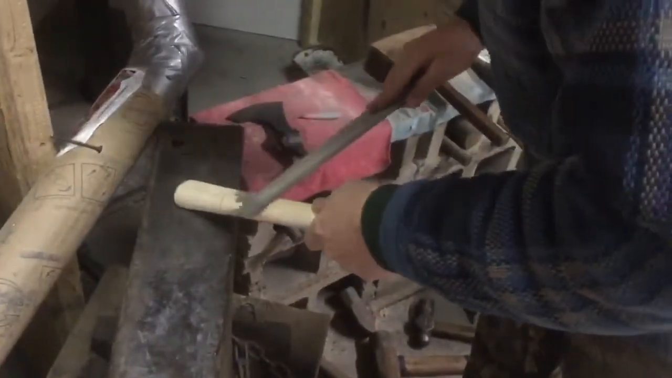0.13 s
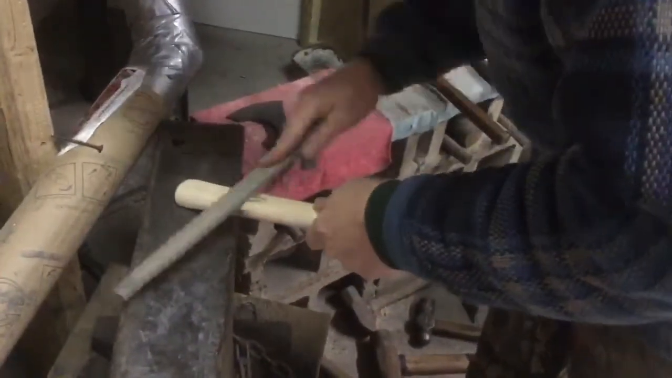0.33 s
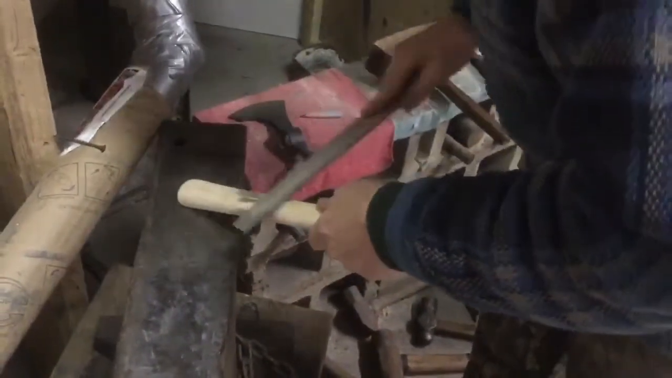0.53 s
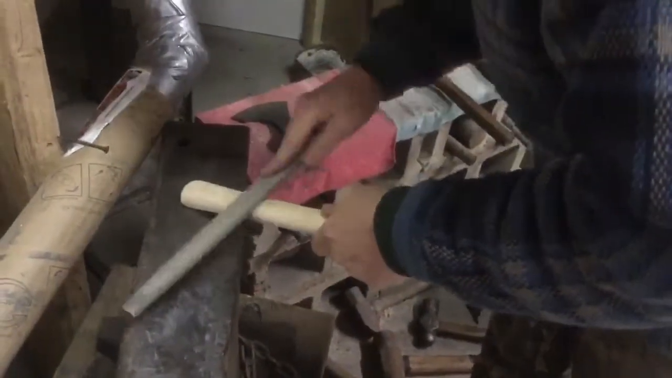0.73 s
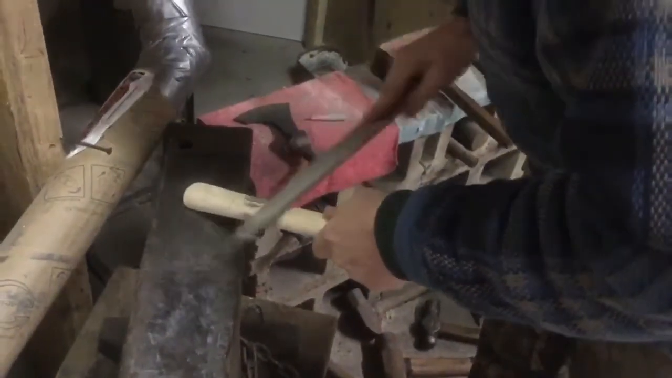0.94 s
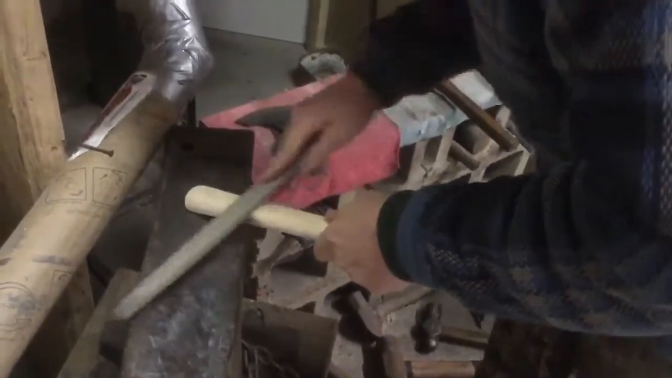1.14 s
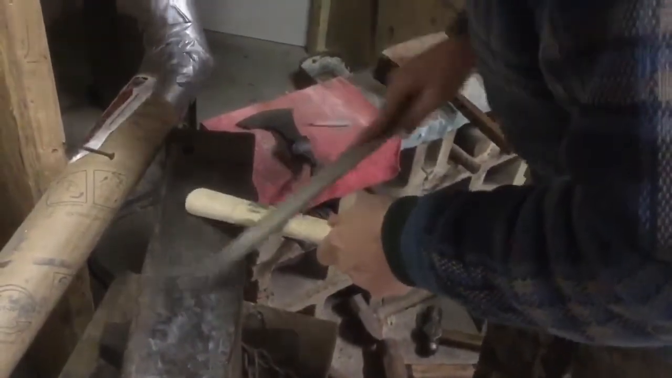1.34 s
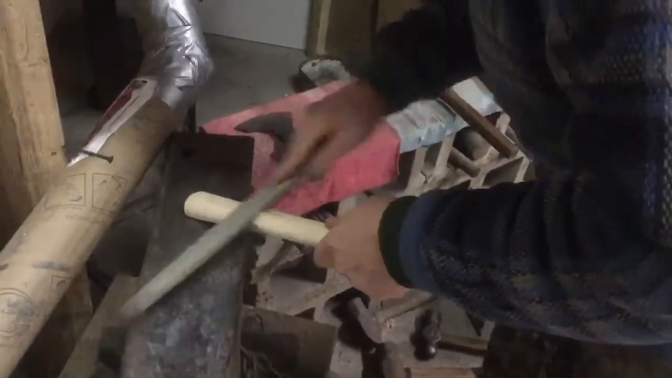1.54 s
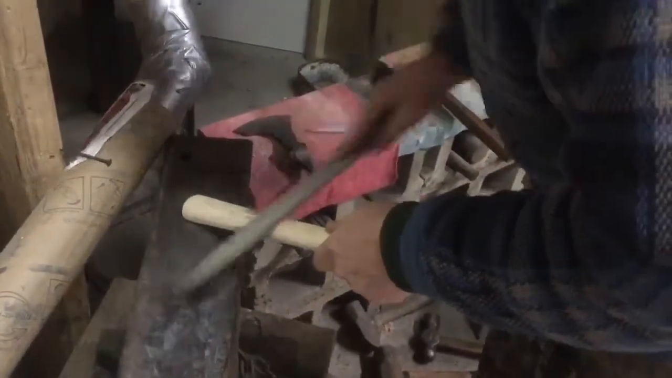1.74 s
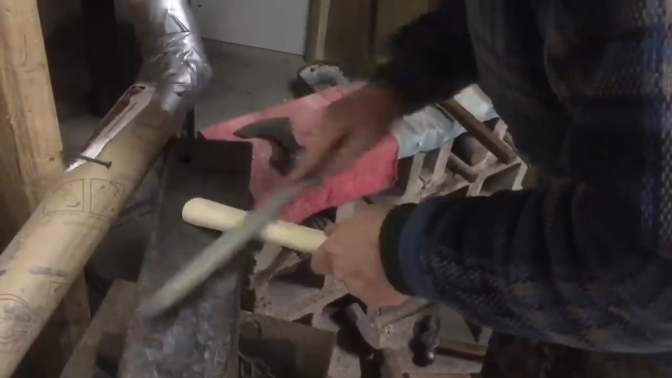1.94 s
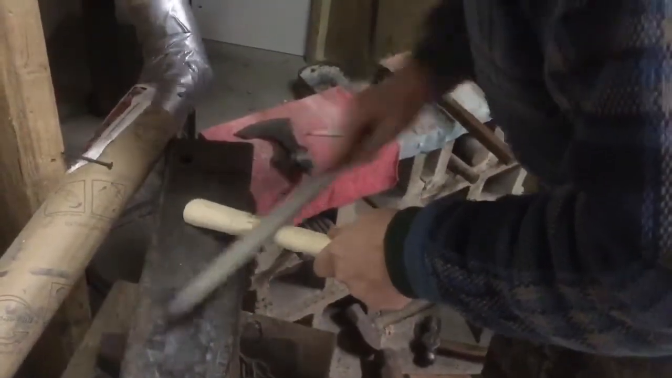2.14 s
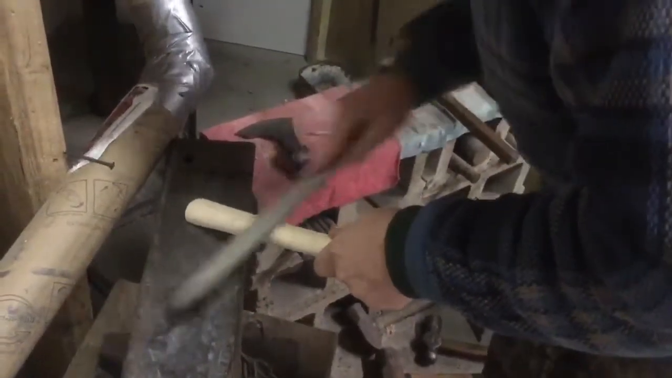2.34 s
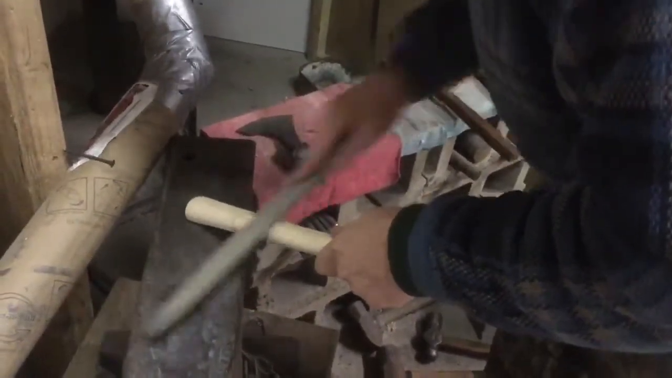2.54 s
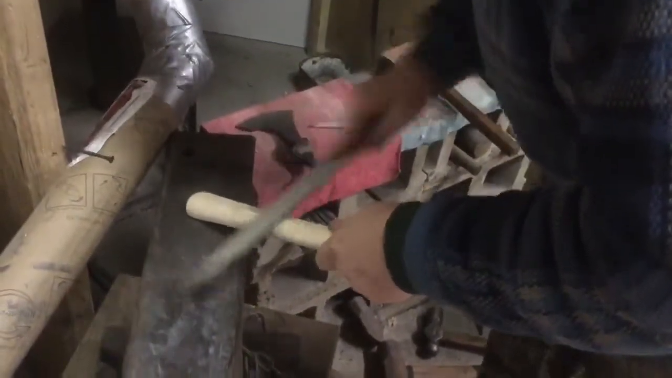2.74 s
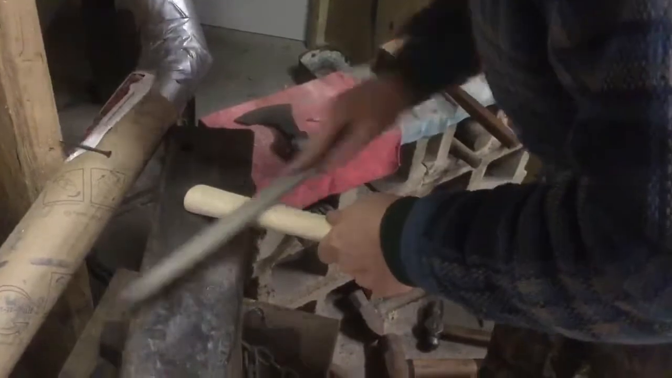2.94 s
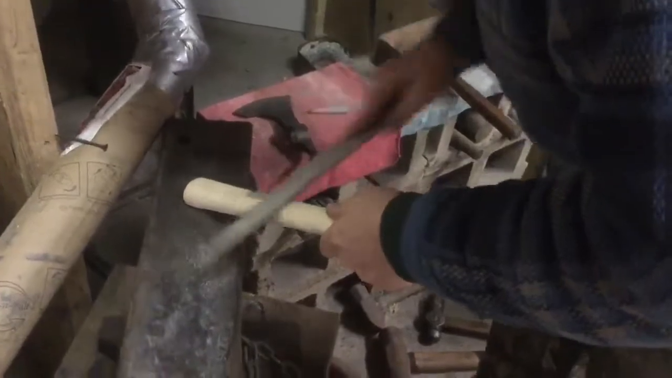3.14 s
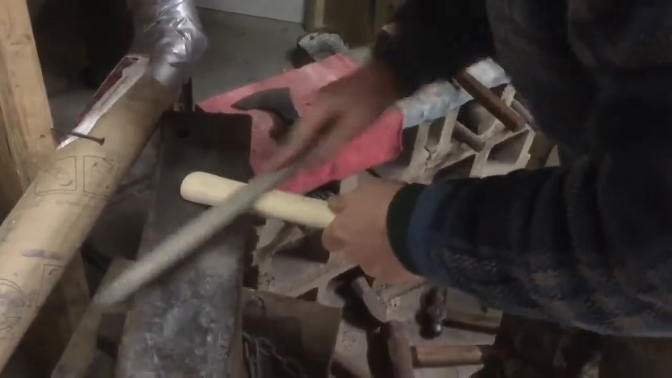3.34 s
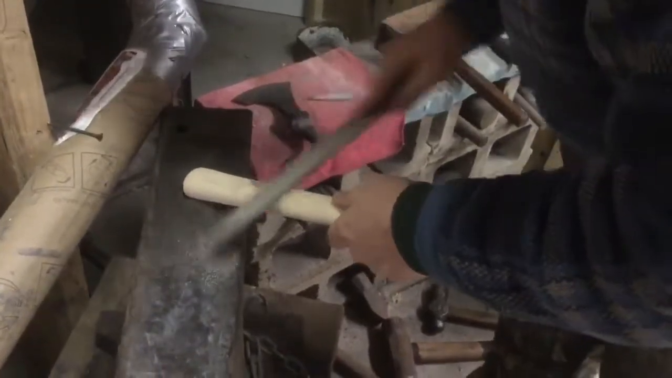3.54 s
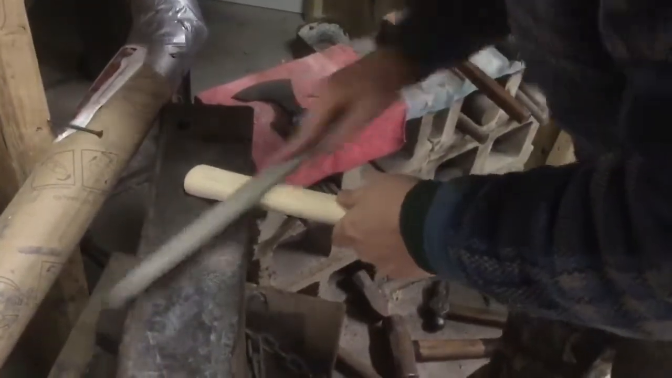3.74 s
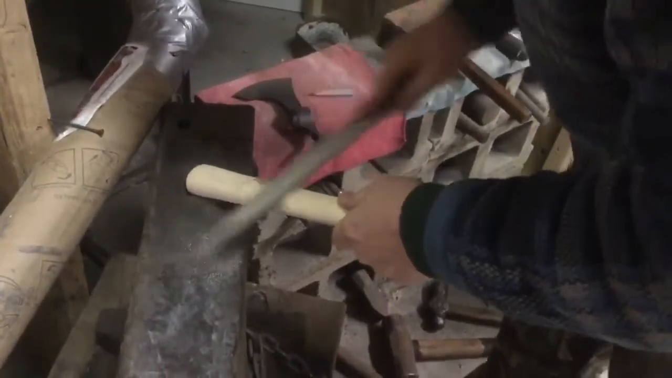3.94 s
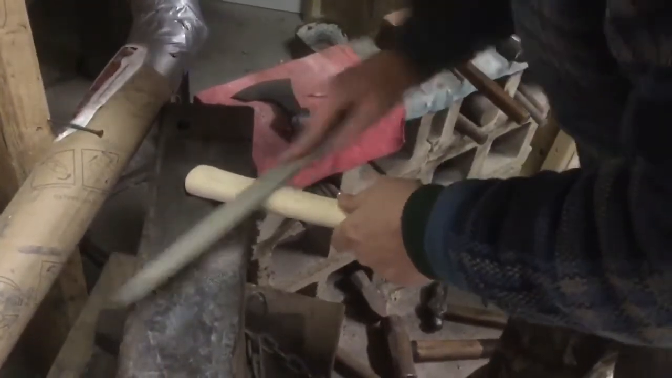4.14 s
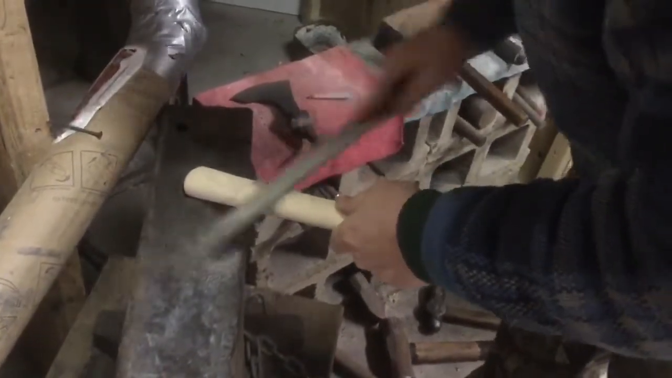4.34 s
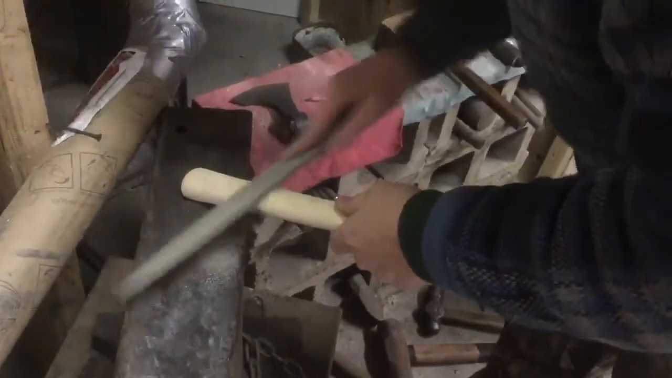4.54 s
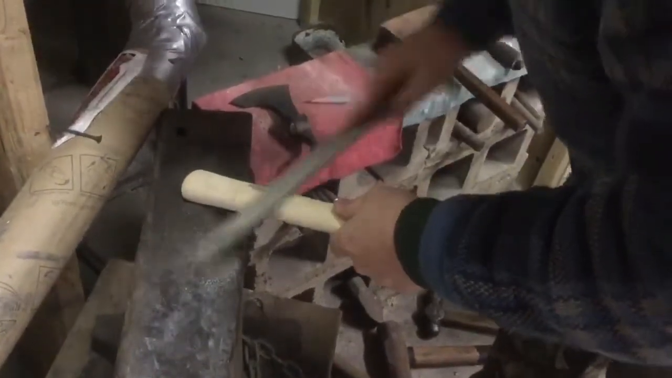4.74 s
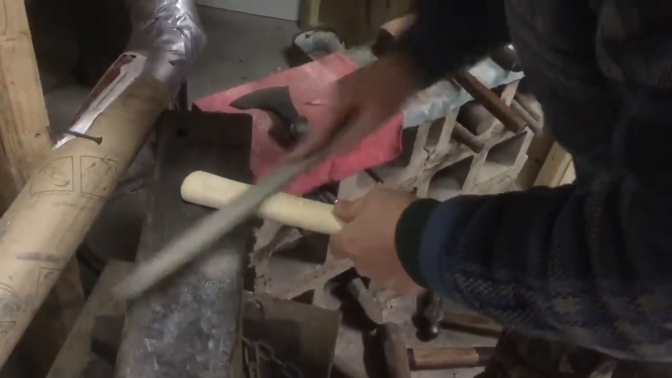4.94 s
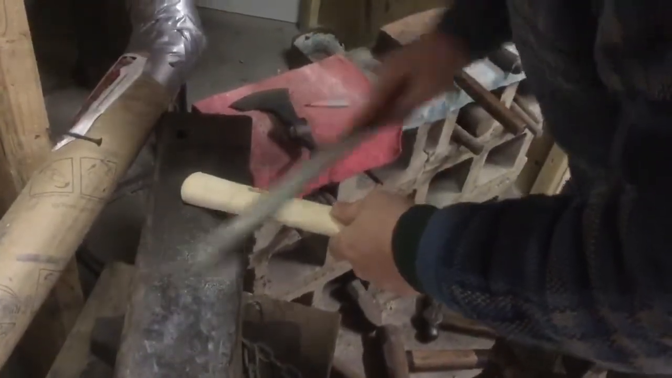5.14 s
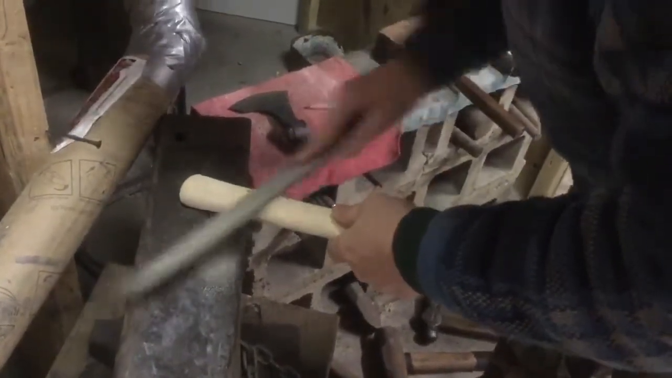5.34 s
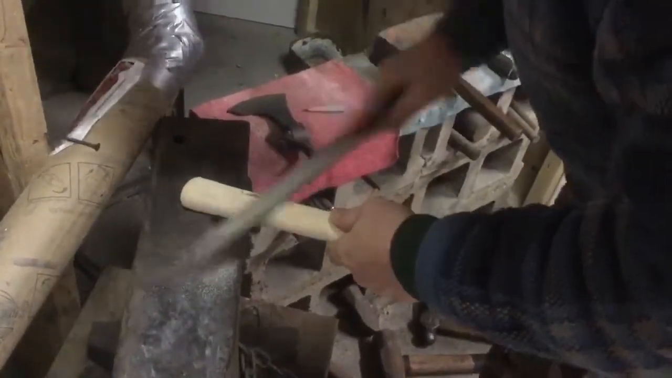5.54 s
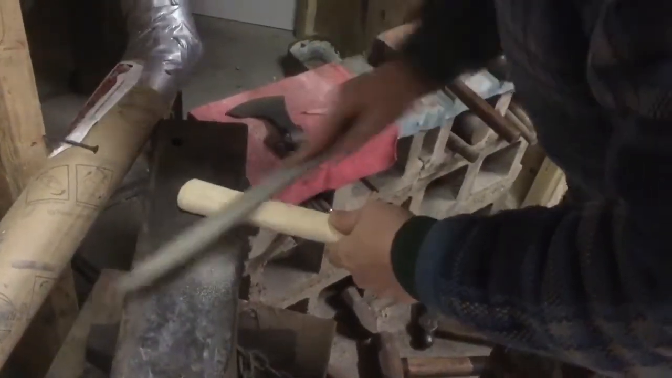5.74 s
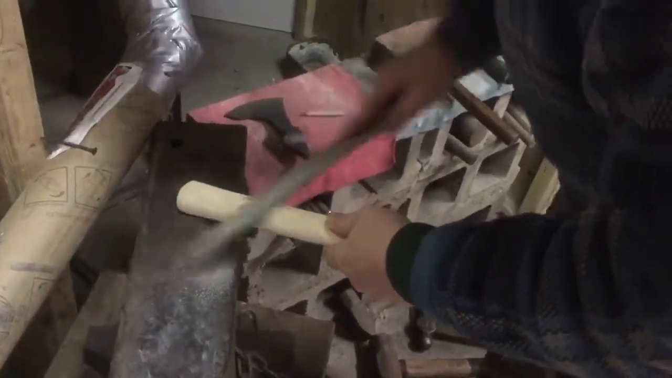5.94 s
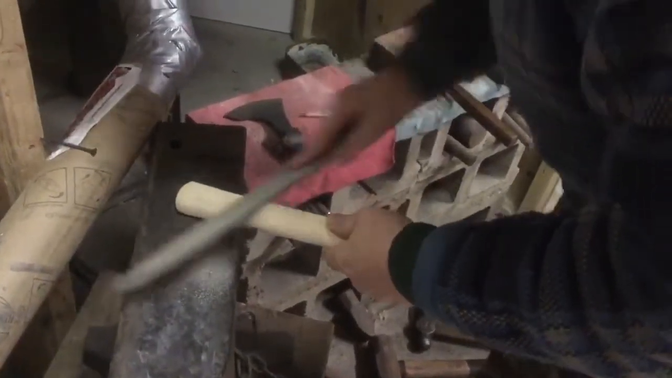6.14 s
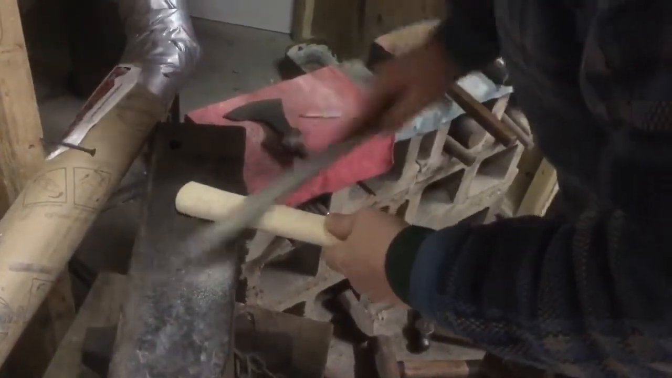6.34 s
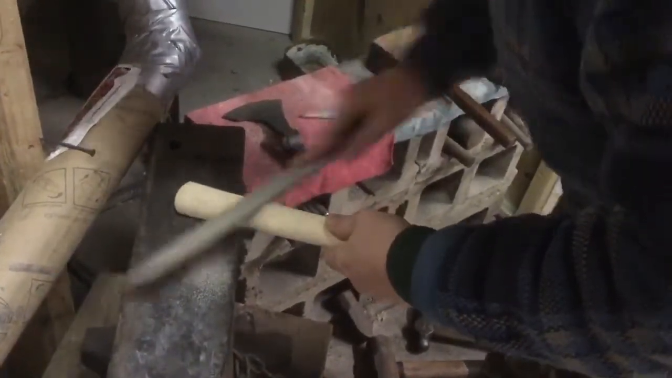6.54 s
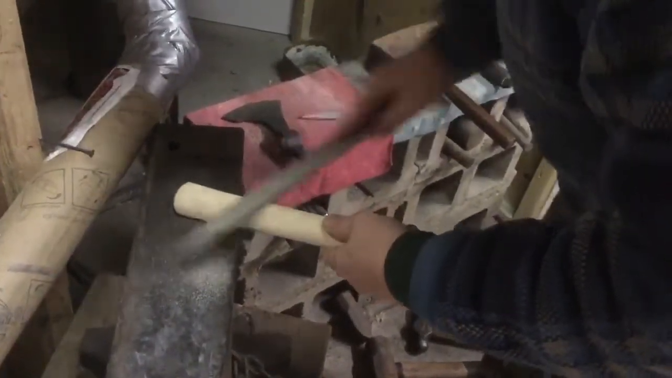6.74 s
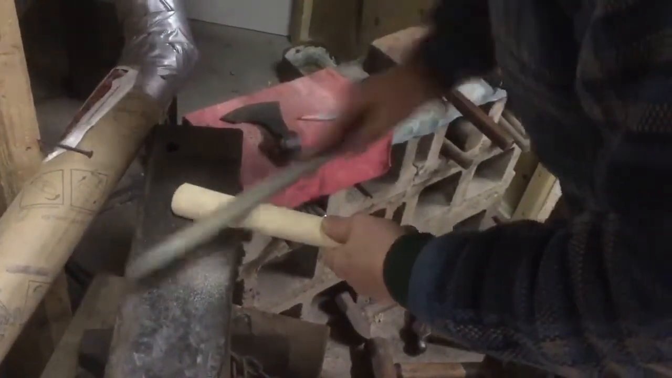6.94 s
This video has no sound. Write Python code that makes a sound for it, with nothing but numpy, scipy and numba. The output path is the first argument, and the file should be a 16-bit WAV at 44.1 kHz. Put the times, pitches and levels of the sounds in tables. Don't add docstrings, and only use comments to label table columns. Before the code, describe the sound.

After a small tap, coarse file strokes scrape wood in a steady fast to-and-fro rhythm, close up in a small workshop.

```python
import sys
import numpy as np
from scipy import signal
from scipy.fft import rfft, irfft
from scipy.io import wavfile
from scipy.ndimage import uniform_filter1d
from numba import njit

SR = 44100
rng = np.random.default_rng(int(sys.argv[2]) if len(sys.argv) > 2 else 0)


def digitize_waveform(pressure):
    field = np.atleast_2d(pressure).T
    bounded = np.clip(field, -1, 1)
    quanta = np.round(bounded * 32767).astype(np.int16)
    wavfile.write(sys.argv[1], SR, quanta)


def volts_from_db(level):
    exponent = np.asarray(level, float) / 20
    return 10 ** exponent


N = 313110

# turn in seconds, top in dB, lean (late minus early) in dB, handle share in dB,
# wood face share in dB.
PUSHES = [(.117, -29, 13.5, -14, -3), (.576, -26.5, 2, -20, -2.1), (.948, -25.5, 2, -19, -0.5),
          (1.317, -26.5, 0, -22.5, -0.5), (1.698, -25.5, -2.5, -19.5, -1), (2.079, -26.5, 1.5, -19.5, -0.6),
          (2.459, -29.5, -1.5, -16, 2.5), (2.851, -27.5, 0, -18, 1.5), (3.229, -29, 1.5, -20.5, -0.7),
          (3.628, -27, 2, -21.5, -1.5), (4.031, -26.5, 3.5, -20, -1.3), (4.439, -27, 2, -18.5, -2.5),
          (4.839, -28, 4.5, -20, 0), (5.237, -27.5, -3, -18, -1.6), (5.644, -28, 4, -17.5, -1.5),
          (6.041, -27.5, -0.5, -19, -0.8), (6.443, -27.5, -3, -20.5, -1.5), (6.853, -26.5, 6, -20.5, -2.5)]
# turn in seconds, top in dB, lean (late minus early) in dB, handle share in dB,
# wood face share in dB.
PULLS = [(0.39, -35, -1, -8.5, 3), (.777, -35, 4, -10, 0.3), (1.143, -33.5, -6, -8, 3),
         (1.517, -34.5, 0, -11, 1.2), (1.9, -34.5, 4, -5, 1), (2.279, -34, 2.5, -8.5, 0),
         (2.657, -34.5, -2, -14.5, 1.1), (3.046, -32.5, 5, -14.5, 0.3), (3.436, -33.5, -3.5, -19.5, -0.5),
         (3.838, -34, -5.5, -9, 0.4), (4.237, -33.5, -5, -19, 1), (4.645, -32.5, 6.5, -18.5, 0.5),
         (5.041, -30.5, 0, -17.5, -1.5), (5.447, -31.5, 1, -15, -4), (5.847, -31.5, 7, -17, -3.5),
         (6.248, -31, 3, -19, -4.5), (6.656, -29.5, 0.5, -17.5, -6), (7.058, -30, -6, -18, -4)]
# share of the stroke, push in dB under the top, pull in dB under the top.
STROKE_COURSE = [
    (.09, -13, -9),
    (.22, -5, -4.5),
    (.45, -1.5, -0.26),
    (.7, -0.53, -1.1),
    (.84, -6.5, -2.5),
    (.93, -14, -6),
]
TURN_DB, FIRST_TURN_DB, LAST_PULL_S = (-50, -45.5), -61.5, 0.17
# low edge in Hz, high edge in Hz, trim in dB, dulling in dB per dB of slack,
# pitch bend as a share.
PARTS = [
    (467, 877, 0, -0.57, 0.099),
    (870, 1273, 1.5, -0.25, 0.035),
    (1331, 2845, -1.5, -0.01, 0.034),
    (2691, 4910, 0, 0, .012),
    (4900, 8160, -12.5, 0.32, 0.0018),
    (8750, 19000, 1.5, 1.15, .002),
]
# pitch in Hz, width in Hz, push level in dB, pull level in dB.
RUBBED_MODES = [(584, 72, -4.5, -15.5), (740, 130, -14, -25.5), (1006, 53, -12, 9), (1195, 104, -6.5, -11),
                (1408, 31, -7.5, -29), (1488, 39.5, -2.5, -8.5), (1759, 95, -1.5, -9.5),
                (2029, 98, -7.5, -0.5), (2320, 246, -1.5, -14.5), (2687.5, 295, -5.5, -9),
                (3110, 127, -5.5, -3.5), (3388, 77, -3, -7.5), (3643, 163, 0, -6.5), (3975, 140, -2, -3),
                (4274, 74, -2, -3.5), (4492, 45, -1, -7), (4817, 210, -9, -12.5), (5306, 255, -18, -22.5),
                (6004, 227, -14, -19), (6680, 820, -25, -32), (7094, 125, -20.5, -22),
                (7440, 180, -24.5, -34.5), (8147, 87, -19, -25.5), (8768, 105, -23.5, -24),
                (9200, 450, -33.5, -49), (10180, 120, -28, -31), (11130, 910, -41, -62),
                (12430, 190, -31, -32.5), (13200, 1100, -46, -62), (14520, 260, -40.5, -42)]
# push first, middle, last in dB, then pull first, middle, last in dB.
BENCH_SHARE = (-33, -27, -19, -27, -25, -24.5)
# push first, middle, last in dB, then pull first, middle, last in dB.
EDGE_SHARE = (-30, -28, -26, -24, -28, -35)
HANDLE_SLIDE_DB, FACE_SLIDE_DB, EDGE_SLIDE_DB, BENCH_SLIDE_DB = (-6, 1.5), (-7, 2), (0, -3), (2, 2)
EDGE_FOLLOWS = 0.35
# middle in seconds, length in seconds, first tooth rate in Hz,
# last tooth rate in Hz, top in dB.
SQUEAKS = [(.275, .036, 1490, 1385, -26), (0.316, .04, 1290, 1120, -27.5), (1.405, .04, 2840, 2760, -36),
           (1.445, .036, 2750, 2120, -18.5), (1.467, .022, 1950, 1680, -24), (1.36, .05, 2300, 2450, -28),
           (1.814, .09, 2560, 2050, -32), (2.35, .035, 2380, 2680, -33), (2.378, .03, 2680, 2680, -28),
           (2.413, .025, 2300, 1950, -29), (2.525, .03, 2150, 2520, -20.5), (2.582, .035, 2480, 2050, -25),
           (2.802, .028, 2350, 1750, -24), (3.305, 0.042, 1502, 1440, -37.5), (3.367, .05, 1796, 1870, -30),
           (1.076, 0.062, 2497, 1955, -30), (1.351, .04, 1053, 1190, -37), (2.191, .1, 779, 740, -51),
           (2.56, 0.085, 776, 755, -51), (4.0, .09, 1028, 1143, -50), (1.069, .08, 1744, 1790, -33),
           (.675, .06, 1495, 1454, -37), (3.69, .05, 1517, 1530, -33.5), (1.229, .05, 990, 1034, -28.5)]
SQUEAK_FALL_DB = 15.5
# start in seconds, peak in dB.
TAPS = [
    (0.0316, -21.5),
    (0.0676, -37),
]
# pitch in Hz, level in dB, time to fall 60 dB in seconds.
TAP_MODES = [(313, -29, 0.07), (646, -13, 0.018), (1200, -28, 0.046), (1520, -16, 0.041),
             (2100, -9.5, 0.014), (2200, 2.5, 0.016), (3030, -5, 0.016), (3480, -2.5, 0.013),
             (3900, -8, .012), (4420, -17, 0.011), (5852, -21, .04), (7100, -26, .05)]
TAP_THIN_HZ, TAP_SOFT_HZ, TAP_TAIL_DB, TAP_TAIL_T60_S = 710, 3880, -8, 0.079
# frequency in Hz, level in dB per Hz.
TAP_TAIL = [(200, -47), (500, -15.5), (1100, -8), (2100, 0), (2600, -12), (3500, -8), (4300, -14),
            (5300, -39), (7500, -37), (9000, -79)]
# start in seconds, peak in dB, pitch in Hz.
THUDS = [(0.999, -39.5, 168), (1.524, -42, 320), (1.621, -57, 280), (2.978, -45, 162), (3.472, -33, 196),
         (4.907, -55, 299), (5.676, -47, 324), (6.472, -43, 286), (6.932, -54, 272)]
ROOM_T60_S, ROOM_DB, WALL_CUT_HZ = 0.23, -20.5, 4400
# time in seconds, level in dB.
WEIGHT = [(0.0, -76), (0.04, -45), (0.12, -66), (0.75, -62), (2.43, -66.5), (4.23, -60), (4.43, -73.5),
          (4.65, -52.5), (4.88, -78), (4.9, -63), (5.5, -57), (5.56, -68.5), (6.17, -56), (6.39, -68),
          (6.6, -51), (6.7, -72), (7.06, -56), (7.1, -64)]
# pitch in Hz, width in Hz, level in dB.
PANEL = [(240, 33, -4), (290.7, 27.5, 0.5), (321, 48, -10.5)]
# time in seconds, level in dB.
SWAY = [(0.0, -70.5), (0.97, -67.5), (2.75, -73.5), (2.79, -64.5), (5.02, -71), (5.26, -82), (5.4, -59),
        (5.61, -76), (5.83, -58), (5.89, -78), (6.21, -60.5), (6.47, -84), (6.53, -67), (7.1, -71)]
# frequency in Hz, level in dB per Hz.
RUMBLE = [(30, -45), (60, -10), (100, -8.5), (154, 4.5), (190, -2), (230, -36), (330, -39)]
SHAKE_FOLLOWS = 0.21
# frequency in Hz, level in dB per Hz.
HUSH = [(40, -40), (230, -5.5), (300, -7.5), (550, -13), (1650, -22.5), (2250, -25), (2630, -33),
        (3500, -26), (5300, -55), (8000, -84)]
HUSH_DB = -69
MIC_CUT_HZ = 85


def hand():
    strokes = np.stack([PUSHES, PULLS], axis=1).reshape(-1, 5)
    turns, top_db, lean_db, handle_db, face_db = strokes.T
    lengths = np.diff(turns, append=turns[-1] + LAST_PULL_S)
    pairs = len(PUSHES)
    places, *course_db = np.transpose(STROKE_COURSE)
    along_db = top_db[:, None] + np.tile(course_db, (pairs, 1)) + lean_db[:, None] * (places - 0.5)
    turn_db = np.append(FIRST_TURN_DB, np.tile(TURN_DB, pairs)[1:])
    times = turns[:, None] + lengths[:, None] * np.append(0, places)
    levels = np.column_stack([turn_db, along_db])
    level_db = curve(np.append([0.07], times), np.append([-75], levels))

    stroke = np.maximum(np.searchsorted(turns, np.arange(N) / SR) - 1, 0)
    pulling = stroke % 2
    reach = curve(turns, -(-1.0) ** np.arange(len(turns)))
    late = -reach * (-1.0) ** (stroke + 1) / 2
    handle = handle_db[stroke] + late * np.array(HANDLE_SLIDE_DB)[pulling]
    face = face_db[stroke] + late * np.array(FACE_SLIDE_DB)[pulling]
    push, handle, face = uniform_filter1d([1.0 - pulling, handle, face], size=900)
    return uniform_filter1d(level_db, size=450), push, reach, handle, face


def rasp(level_db, push, reach, handle, face, wander_db):
    bench_db = deepening(BENCH_SHARE, BENCH_SLIDE_DB, push, reach)
    edge = deepening(EDGE_SHARE, EDGE_SLIDE_DB, push, reach)
    neck = 0.66 * (edge - edge.mean())
    shares_db = [bench_db, handle, face, 0, neck, edge + EDGE_FOLLOWS * (level_db + 30)]
    force = fibres(per_s=4000, spread_db=2, smooth=0.98) * volts_from_db(level_db + 0.5 * drift(35))
    slack_db = np.minimum(level_db + 33, 0)
    modes = np.array(RUBBED_MODES)
    out = np.zeros(N)
    for (low_hz, high_hz, trim_db, dulling, bend), share_db in zip(PARTS, shares_db):
        own = modes[(modes[:, 0] >= low_hz) & (modes[:, 0] < high_hz)]
        power = np.pi * own[:, 1] / SR @ volts_from_db(own[:, 2:]) ** 2
        drive = force * volts_from_db(share_db + trim_db + dulling * slack_db)
        drive = drive / np.sqrt(power[0] * push + power[1] * (1 - push))
        part = np.zeros(N)
        first_path = np.sum(modes[:, 0] < low_hz)
        for k, (hz, width_hz, push_db, pull_db) in enumerate(own):
            coupling_db = push_db * push + pull_db * (1 - push) + wander_db * drift(10.6)
            coupling = volts_from_db(coupling_db[::32]).repeat(32)[:N]
            bent_hz = hz * (1 + bend * (0.73 * drift(6.58) - reach))
            path = (first_path + k) % len(drive)
            part += gliding(drive[path] * coupling, bent_hz, width_hz, SR)
        out += bandpass(part, 6, low_hz, high_hz)
    return out


def fibres(per_s, spread_db, smooth):
    sizes = volts_from_db(spread_db * np.minimum(rng.exponential(1, N), 5))
    tears = rng.random(N) < per_s * volts_from_db(3 * drift(60)) / SR
    torn = rms_one(sizes * tears)
    signs = rng.choice([-1, 1], (3, N))
    return rms_one(torn * signs + smooth * rng.standard_normal((3, N)))


def deepening(share, slide_db, push, reach):
    pushing, pulling = (curve(np.linspace(0, N / SR, len(db)), db) for db in np.reshape(share, (2, -1)))
    push_db = pushing + slide_db[0] * reach / 2
    pull_db = pulling - slide_db[1] * reach / 2
    return push * push_db + (1 - push) * pull_db


@njit
def gliding(x, hz, width_hz, sr):
    r, out = np.exp(-np.pi * width_hz / sr), np.zeros(len(x))
    for i in range(2, len(x)):
        feedback = 2 * r * np.cos(2 * np.pi * hz[i] / sr) * out[i - 1] - r * r * out[i - 2]
        out[i] = (1 - r * r) / 2 * (x[i] - x[i - 2]) + feedback
    return out


def squeaks(unsteady, flutter_db):
    out = np.zeros(N)
    wobble = 1 + unsteady * drift(158)
    flutter = volts_from_db(flutter_db * drift(110))
    for s, length, first_hz, last_hz, top_db in SQUEAKS:
        place = np.linspace(-1.3, 1.3, round(1.3 * length * SR))
        at = round((s - 0.65 * length) * SR) + np.arange(len(place))
        hz = first_hz + (last_hz - first_hz) * (place + 1) / 2
        tone = np.sin(2 * np.pi * np.cumsum(hz * wobble[at]) / SR)
        out[at] += np.sqrt(2) * volts_from_db(top_db - SQUEAK_FALL_DB * place ** 2) * tone
    return out * flutter


def taps():
    out = np.zeros(N)
    strengths_db = rng.normal(0, 1.8, (len(TAPS), len(TAP_MODES)))
    for (hz, mode_db, t60), own_db in zip(TAP_MODES, strengths_db.T):
        clicks = np.zeros(N)
        clicks[[round(s * SR) for s, db in TAPS]] = volts_from_db(np.array(TAPS)[:, 1] + mode_db + own_db)
        out += ring(clicks, hz, t60)
    out = bandpass(out, 4, TAP_THIN_HZ, TAP_SOFT_HZ)
    shiver = coloured(TAP_TAIL)
    for s, peak_db in TAPS:
        age = np.maximum(np.arange(N) / SR - s, 0)
        onset = np.minimum(age / 0.0018, 1)
        out += shiver * volts_from_db(peak_db + TAP_TAIL_DB - 60 * age / TAP_TAIL_T60_S) * onset
    return out


def thuds():
    out = np.zeros(N)
    age = np.arange(round(0.06 * SR)) / SR
    for s, peak_db, hz in THUDS:
        swell = volts_from_db(peak_db - 60 * age / 0.036) * (1 - np.exp(-age / 0.002))
        out[round(s * SR):][:len(age)] += swell * np.sin(2 * np.pi * hz * age)
    return out


def bench(level_db):
    stroke_db = SHAKE_FOLLOWS * (level_db - np.median(level_db))
    weight_db = curve(*np.transpose(WEIGHT)) + stroke_db
    deep_db = curve(*np.transpose(SWAY)) + stroke_db - 2.0
    white = rng.standard_normal(N)
    panel = np.zeros(N)
    for hz, width_hz, db in PANEL:
        panel += resonance(resonance(white, hz, width_hz), hz, 3 * width_hz) * volts_from_db(db)
    shake = volts_from_db(deep_db + 4.8 * drift(19)) * coloured(RUMBLE)
    return shake + volts_from_db(weight_db) * rms_one(panel)


def workshop(x):
    out = np.zeros(N)
    dull = np.exp(-2 * np.pi * WALL_CUT_HZ / SR)
    lags = (rng.uniform(0.008, 0.03, 8) * SR).astype(int)
    for k, lag in enumerate(lags):
        loop, state = x.copy(), [0.0]
        gain = volts_from_db(-60 * lag / SR / ROOM_T60_S)
        for i in range(lag, N, lag):
            back, state = signal.lfilter([gain * (1 - dull)], [1, -dull], loop[i - lag:i], zi=state)
            loop[i:i + lag] += back[:N - i]
        out += (loop - x) * (-1) ** k
    return out


def hush():
    return volts_from_db(HUSH_DB) * coloured(HUSH)


def rms_one(x):
    return x / np.sqrt(np.mean(x ** 2) + 1e-20)


def curve(s, values):
    return np.interp(np.arange(N) / SR, s, values)


def drift(rate):
    r = np.exp(-80 * np.pi * rate / SR)
    slow = signal.lfilter([1], [1, -2 * r, r * r], rng.standard_normal(N // 40 + 2002))[2000:]
    return np.interp(np.arange(N) / 40, np.arange(len(slow)), rms_one(slow))


def resonance(x, hz, width_hz):
    r = np.exp(-np.pi * width_hz / SR)
    feedback = [1, -2 * r * np.cos(2 * np.pi * hz / SR), r * r]
    return signal.lfilter(np.array([1, 0, -1]) * (1 - r * r) / 2, feedback, x)


def ring(clicks, hz, t60):
    r = volts_from_db(-60 / (t60 * SR))
    w = 2 * np.pi * hz / SR
    return signal.lfilter([0, np.sin(w)], [1, -2 * r * np.cos(w), r * r], clicks + 1e-18)


def bandpass(x, order, low_hz, high_hz):
    return signal.sosfilt(signal.butter(order, [low_hz, high_hz], "band", fs=SR, output="sos"), x)


def coloured(points):
    hz, level_db = np.transpose(points)
    bins = np.maximum(np.arange(N // 2 + 1) * SR / N, 1)
    shape = volts_from_db(np.interp(np.log(bins), np.log(hz), level_db))
    return rms_one(irfft(rfft(rng.standard_normal(N)) * shape, N))


def scene():
    motion = hand()
    near = rasp(*motion, wander_db=3) + squeaks(unsteady=0.01, flutter_db=1.7) + taps() + thuds()
    mix = near + volts_from_db(ROOM_DB) * workshop(near) + bench(motion[0]) + hush()
    return mix[None]


def low_pass(x):
    return signal.sosfilt(signal.butter(12, 15650, fs=SR, output="sos"), x)


def record(dry):
    thin = signal.sosfilt(signal.butter(2, MIC_CUT_HZ, "high", fs=SR, output="sos"), dry)
    return low_pass(thin)


dry = scene()
out = record(dry)
digitize_waveform(out)
```